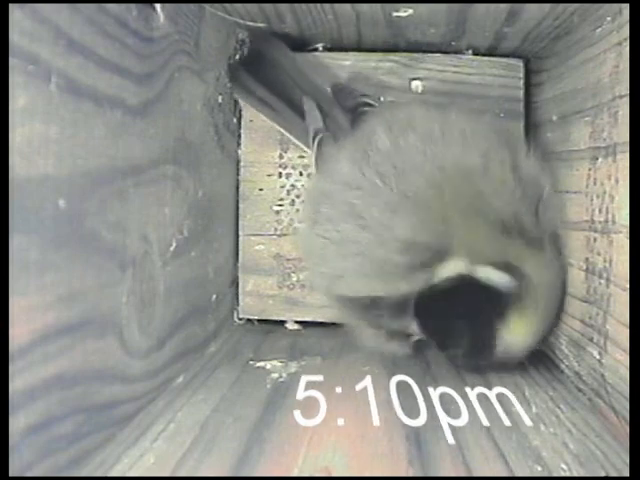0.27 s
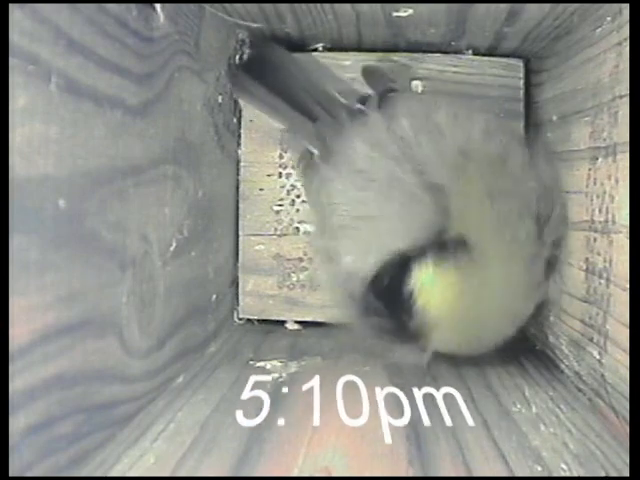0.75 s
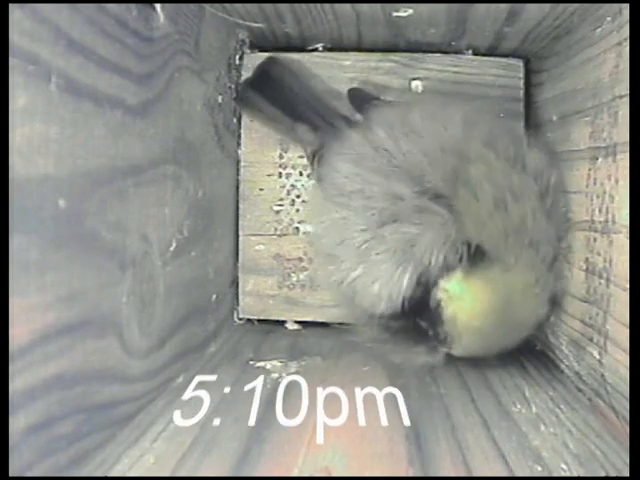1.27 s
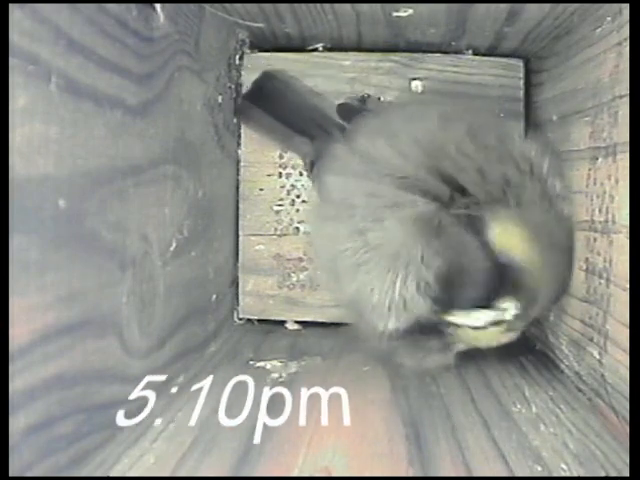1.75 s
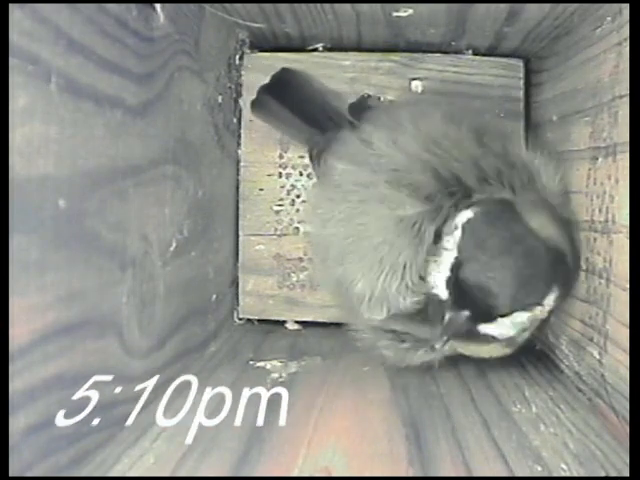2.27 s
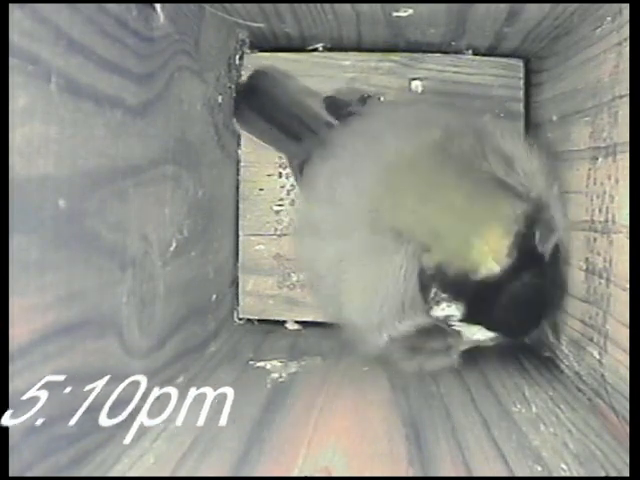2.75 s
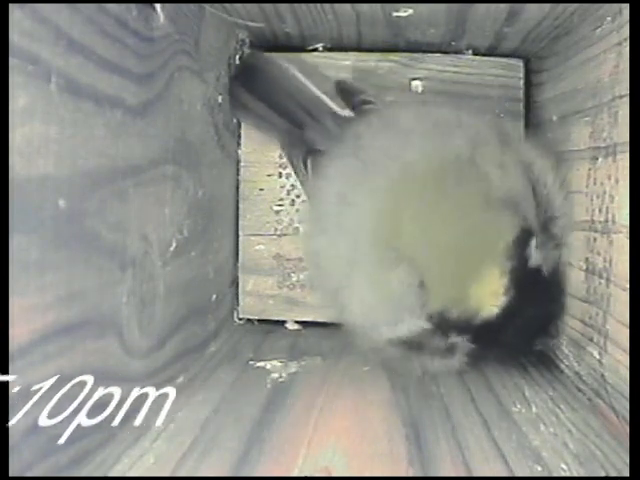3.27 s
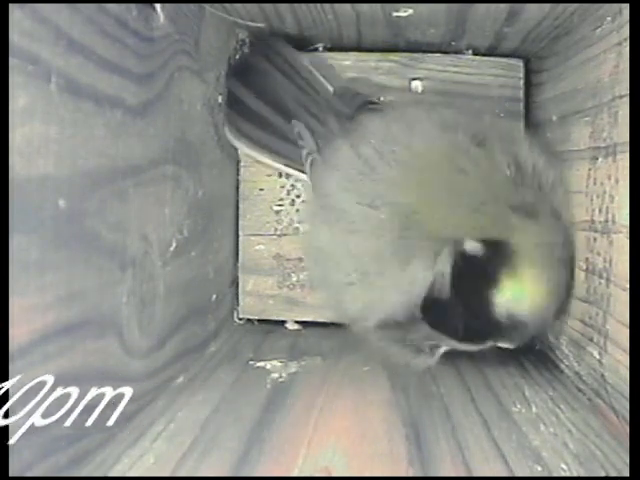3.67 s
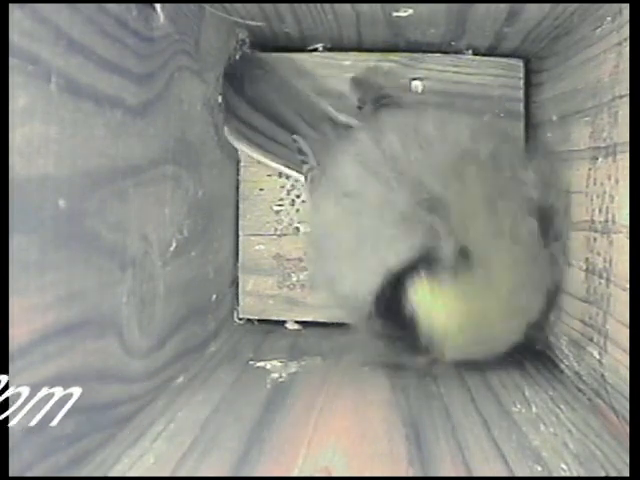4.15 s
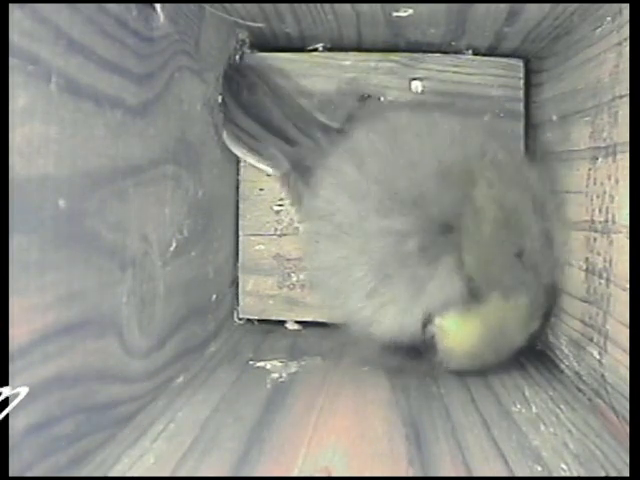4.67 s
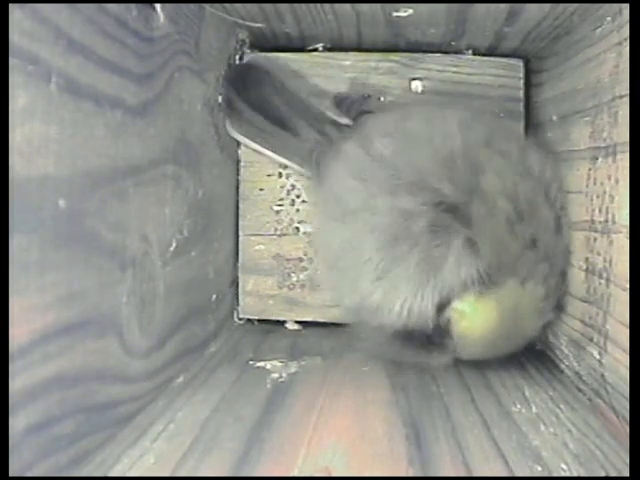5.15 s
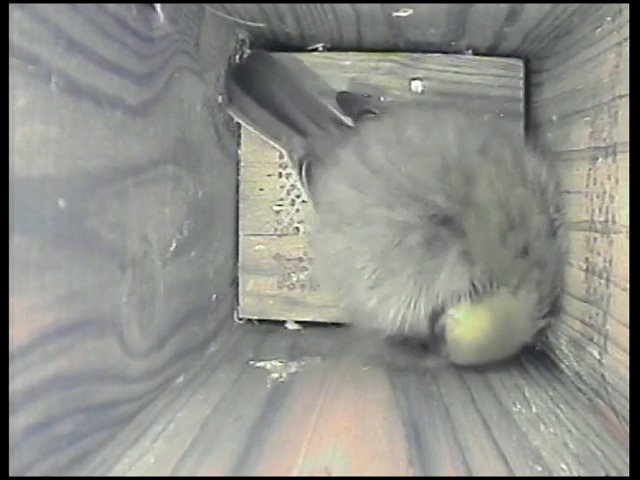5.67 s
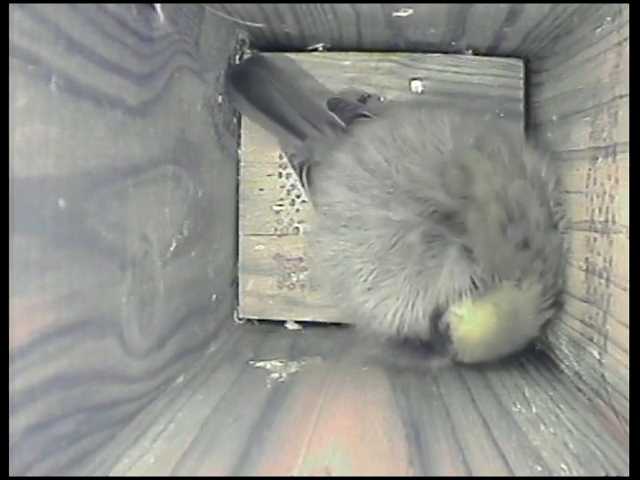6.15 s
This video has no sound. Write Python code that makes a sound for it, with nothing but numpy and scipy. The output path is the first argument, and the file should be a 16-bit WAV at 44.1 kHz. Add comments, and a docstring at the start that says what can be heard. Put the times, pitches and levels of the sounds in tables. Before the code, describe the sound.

A close mono microphone inside a small wooden nest box picks up a steady low hum, faint hiss and an extremely high, thin whine. At first there is only slight feather rustle, with a soft low bump near 0.5 s. Around 1 to 1.3 s, light claw steps patter, with a tiny bright scratch. At 1.7 s one crisp woody knock stands out as the loudest event. Smaller taps and soft floor nudges follow around 2 to 2.3 s. From 2.8 s light steps resume, leading to a hard knock and quick scratches at 3.3 s, then pattering and a brief hollow rub at 3.7 s. Between 4.4 and 5.1 s feather strokes come thick and dry, with muffled low thumps around 4.5 to 4.8 s. Faint steps and wall rubbing continue from 5.4 to 5.8 s. The hum deepens slightly near 5.9 s as the bird quietens until the end at about 6.4 s.

```python
"""A low hum in a wooden nest box, amplifier hiss and a thin line whine open the scene, with faint rustling.
A small bird then shuffles and preens right under a little camera: its body nudges the floor with low pushes,
its claws and beak knock, click and scratch on the boards, and its feathers and feet rub a wall.
Contacts are struck resonances, rustle and rubbing are shaped noise, hum is resonant noise, whine is sines."""
import sys
import numpy as np
from scipy.fft import rfft, irfft, next_fast_len
from scipy.io import wavfile
from scipy.ndimage import map_coordinates

SR = 44100
rng = np.random.default_rng(int(sys.argv[2]) if len(sys.argv) > 2 else 0)


def to_wav(sig):
    """Store sig (one row per channel, or 1-D mono) as 16-bit WAV at the path in sys.argv[1].

    Samples outside -1..1 are clipped; the rate is SR.
    """
    pcm = np.clip(np.atleast_2d(sig), -1, 1) * 32767
    pcm = np.round(pcm).astype(np.int16)
    wavfile.write(sys.argv[1], SR, pcm.T)  # frames by channels


N = 282240
TIME_S = np.arange(N) / SR
TOP_HZ = 16000

# "rel." levels are relative: a trim or normalisation follows; mode levels are peak gains
# low rumble, spectrum: [f/Hz, rel. level/dB per Hz]
RUMBLE_SPECTRUM = [(10, -20), (25, -5.5), (50, 1.5), (100, -5), (170, -8.5), (240, -1.5), (400, -25),
                   (700, -26.5), (2000, -61)]
# hum of the box over time: [t/s, rel. level/dB]
HUM_LEVEL = [(0, -49), (.8, -53.5), (1.7, -51.5), (2.4, -53), (3.0, -44), (3.4, -51), (4.1, -50.5),
             (5.1, -47), (5.4, -50), (6.4, -51)]
# modes of the hollow: [f/Hz, width/Hz, rel. level/dB]
HOLLOW_MODES = [(318.7, 34, 5), (258, 46, -7)]
# air of the box, spectrum: [f/Hz, rel. level/dB per Hz]
AIR_SPECTRUM = [(200, -9), (420, 2.5), (600, -7.5), (760, 5), (880, -1.5), (1020, -1), (1270, -4.5),
                (1520, 2), (1690, -9.5), (1830, -5.5), (2050, -21), (3000, -25), (8000, -69)]
# low drone that swells late: [t/s, level/dB rms]
SURGE_LEVEL = [(0, -71), (4.2, -56.5), (4.6, -58), (5.4, -59.5), (5.9, -50), (6.4, -55.5)]
# bands of that drone: [f/Hz, width/Hz, rel. level/dB]
SURGE_BANDS = [(100, 71, -2.5), (239.5, 19.5, 8)]
# amplifier hiss, spectrum: [f/Hz, rel. level/dB per Hz]
HISS_SPECTRUM = [(500, 1.5), (2700, 0.5), (3600, -2), (5000, -4), (7000, -1.5), (8500, -5.5), (10000, -13),
                 (13000, -14), (15500, -15)]
# camera whine: [f/Hz, level/dB rms]
WHINE_TONES = [(15625.4, -53.8), (9286.5, -81.5), (6334, -89)]
# restlessness, as feather stir: [t/s, level/dB before fidgeting]
STIR_LEVEL = [(0, -74), (.2, -73.5), (.7, -63.5), (1.2, -72.5), (1.5, -69), (1.75, -75), (2.5, -74.5),
              (2.75, -65), (3.05, -69), (3.4, -62), (3.85, -68), (4.5, -63), (4.8, -67), (5.25, -66),
              (5.8, -70), (6.4, -78.5)]
# stronger beak and wing strokes through feathers: [t/s, rel. level/dB, half length/s]
STROKES = [(.315, -65, 0.038), (0.874, -63.5, 0.028), (1.065, -61, .035), (1.3, -64.5, 0.037),
           (3.133, -63, .029), (3.557, -59.5, 0.026), (3.652, -61.5, 0.038), (3.742, -60, 0.042),
           (3.92, -60, 0.035), (4.427, -61, .035), (4.553, -58.5, 0.046), (4.687, -56.5, 0.022),
           (4.825, -57.5, .018), (4.982, -56.5, 0.024), (5.081, -59.5, 0.018), (5.324, -61, 0.018),
           (5.461, -58, .04), (5.592, -58.5, 0.021), (5.91, -62.5, 0.019)]
# feather rustle, spectrum: [f/Hz, rel. level/dB per Hz]
FEATHER_SPECTRUM = [(1000, -15), (2500, -20), (3800, -11), (5000, -3.5), (6600, -0.5), (8100, -0.5),
                    (9800, -9), (10700, -8), (12500, -15), (15000, -39)]
# air and boards of the box: [nominal f/Hz, width/Hz, rel. level/dB]
BOX_MODES = [(260, 140, -14.5), (556, 98, -48), (706, 93, 0.5), (939, 110, 6), (1182, 60, -9.5),
             (1516, 89, -2.5), (1740, 107, -9), (2710, 61, -9.5)]
# bright ring of a claw on wood: [nominal f/Hz, width/Hz, rel. level/dB]
CLAW_MODES = [(4600, 400, -5), (5715, 200, 4), (7250, 410, 2.5), (7850, 210, 7), (9540, 340, -2.5),
              (11060, 530, -12)]
# body against floor: [t/s, rel. level/dB, push f/Hz]
NUDGES = [(.525, -47, 86), (0.952, -46, 59), (1.076, -48, 75), (2.156, -43, 100), (2.18, -42, 114),
          (3.321, -45, 55.5), (3.726, -43.5, 55), (4.547, -36.5, 49), (4.667, -38, 50.6),
          (4.809, -39.5, 44.6), (5.298, -44, 54)]
# dull scuff of a nudge, spectrum: [f/Hz, rel. level/dB per Hz]
SCUFF_SPECTRUM = [(20, -6), (60, -12), (180, 5.0), (300, 1), (700, -54), (2000, -70)]
# claw and beak contacts: [t/s, knock peak level/dB, click rel. level/dB re knock, favoured centre f/Hz]
TAPS = [(0.971, -35, -17, 845), (1.181, -34.5, -26, 1050), (1.249, -41, -24, 940), (1.551, -38.5, -14, 923),
        (1.666, -35, -18, 836), (1.6893, -16.5, -20.5, 930), (1.701, -39, -35, 950),
        (1.819, -41.5, -15, 950), (2.017, -30, -22, 1550), (2.030, -27, -11, 990), (2.076, -44, -20, 900),
        (2.251, -53, 4, 1460), (2.762, -36, -32, 910), (2.795, -35, -14, 966), (3.105, -41, -23, 1510),
        (3.114, -27.5, -22, 939), (3.13, -33.5, -17, 915), (3.294, -36, -16, 750), (3.317, -22, -23, 980),
        (3.332, -34, 1.5, 1630), (3.443, -35, -26, 940), (3.679, -38, -16, 750), (4.089, -39.5, -10.5, 710),
        (4.557, -38.5, -3, 730), (5.688, -38, -18, 1550)]
# runs of light steps: [start t/s, end t/s, knock peak level/dB, favoured centre f/Hz]
SHUFFLES = [(1.052, 1.35, -43, 1110), (1.871, 1.949, -48.5, 930), (2.802, 2.92, -46.5, 1010),
            (3.452, 3.802, -44, 1480), (5.417, 5.75, -48, 790)]
# claws slipping over the grain: [t/s, ring level/dB, rasp rel. level/dB, half length/s, ring centre f/Hz]
SCRATCHES = [(1.062, -39.5, -70, 0.0022, 7100), (1.074, -55, -57, 0.0059, 5700),
             (1.679, -59, -67, 0.0057, 8500), (1.849, -50, -58, 0.0034, 5160),
             (3.317, -32, -37, 0.0013, 7900), (3.322, -41, -42.5, .0057, 7900),
             (3.338, -41, -45.5, 0.0059, 7800), (3.682, -57, -55.5, 0.011, 4600),
             (4.554, -55, -54, .0023, 7000), (4.839, -53, -55.5, 0.0025, 7900),
             (5.932, -52.5, -75, 0.0015, 4600)]
# rasp across the grain, spectrum: [f/Hz, rel. level/dB per Hz]
RASP_SPECTRUM = [(500, -13), (1500, 17), (2200, -6), (2800, -1), (3700, -4.5), (4300, -7), (6000, -14),
                 (7700, -1), (9100, -13), (10700, 0), (15000, -36)]
# feet and feathers on a wall: [t/s, level/dB rms at height, half length/s, mode f/Hz, width/Hz]
BRUSHES = [(1.282, -52, 0.023, 950, 140), (2.806, -59, 0.015, 950, 140), (3.687, -44.5, 0.013, 734, 5.9),
           (4.904, -54.5, 0.098, 765, 34), (5.66, -60.5, 0.4, 775, 31)]


def amp(db):
    """Decibels to gain."""
    return 10 ** (np.asarray(db) / 20)


def unit(x):
    """Scale to rms 1."""
    return x / np.sqrt(np.mean(x ** 2) + 1e-20)


def curve(points):
    """Interpolate (t/s, value) points to one value per sample."""
    t_s, values = np.transpose(points)
    return np.interp(TIME_S, t_s, values)


def filtered(x, response):
    """Multiply the spectrum of x by a response of frequency in Hz."""
    size = next_fast_len(len(x) + 8192)
    f_hz = np.fft.rfftfreq(size, 1 / SR)
    return irfft(rfft(x, size) * response(f_hz), size)[:len(x)]


def coloured(x, spectrum):
    """Shape x by (f/Hz, level/dB) points on a log-frequency axis, at rms 1."""
    hz, db = np.transpose(spectrum)
    return unit(filtered(x, lambda f: amp(np.interp(np.log(f + 1), np.log(hz), db))))


def ring(x, modes):
    """Drive parallel resonances of alternating sign."""
    def response(f):
        total = 0
        for k, (hz, width_hz, db) in enumerate(modes):
            resonance = hz * width_hz / (hz * hz - f * f + 1j * f * width_hz)
            total = total + (-1) ** k * amp(db) * resonance
        return total
    return filtered(x, response)


def noise():
    """White noise."""
    return rng.standard_normal(N)


def clipped_noise():
    """White noise held within +-2."""
    return np.clip(noise(), -2, 2)


def grains(rate_hz, spread_db):
    """Tiny slips of uneven size at random times, at rms 1."""
    slipping = rng.random(N) < rate_hz / SR
    return unit(slipping * noise() * amp(spread_db * clipped_noise()))


def wobble(rate_hz):
    """Smooth random curve, rate_hz knots a second."""
    return map_coordinates(clipped_noise(), [TIME_S * rate_hz])


def swell(t_s, half_s):
    """Smooth rise and fall of one movement."""
    return np.exp(-np.minimum(((TIME_S - t_s) / half_s) ** 2, 20))


def stroke(x, t_s, half_s):
    """Part of x sounded by one movement, rms 1 at its height."""
    shape = swell(t_s, half_s)
    return x * shape * np.linalg.norm(shape) / np.linalg.norm(x * shape)


def add(track, t_s, sound):
    """Mix a sound into the track at t_s."""
    room = track[round(t_s * SR):][:len(sound)]
    room += sound[:len(room)]


def favoured(modes, centre_hz, favour_db, octaves):
    """Where a contact lands favours modes near centre_hz; chance varies pitch and level."""
    chance = rng.normal(0, [.015, 1.5], (len(modes), 2))  # sd: fraction of pitch, dB
    varied = []
    for (hz, width_hz, db), (shift, luck_db) in zip(modes, chance):
        nearness = np.exp(-(np.log2(hz / centre_hz) / octaves) ** 2)
        varied.append((hz * (1 + shift), width_hz, db + favour_db * nearness + luck_db))
    return varied


def drone(rumble_db, hum_trim_db, air_db):
    """Background noise hums, at varying level, in the hollow of the box and its higher modes."""
    rumble = amp(rumble_db) * coloured(noise(), RUMBLE_SPECTRUM)
    hollow = filtered(ring(noise(), HOLLOW_MODES), lambda f: 1 / (1 + (f / 480) ** 4))  # low-pass
    hum = amp(curve(HUM_LEVEL) + hum_trim_db) * unit(hollow)
    air = amp(air_db) * coloured(noise(), AIR_SPECTRUM)
    surge = amp(curve(SURGE_LEVEL)) * unit(ring(noise(), SURGE_BANDS))
    return rumble + hum + air + surge


def camera(hiss_db):
    """Amplifier hiss and the steady sine whine of the line scan."""
    whine = sum(amp(db) * np.sqrt(2) * np.sin(2 * np.pi * hz * TIME_S) for hz, db in WHINE_TONES)
    return amp(hiss_db) * coloured(noise(), HISS_SPECTRUM) + whine


def feathers(stroke_trim_db, box_db, bright_db, crackle_db, crackle_rate_hz, flick_db):
    """Barbs slide in tiny uneven bursts, a few flick free; the wood faintly answers, low and bright."""
    # small movements between strokes: 27 knots a second, 2.5 dB depth
    fidget = amp(curve(STIR_LEVEL) + 2.5 * wobble(rate_hz=27))
    power = fidget ** 2
    for t_s, db, half_s in STROKES:
        power += (amp(db + stroke_trim_db) * swell(t_s, half_s)) ** 2
    effort = np.sqrt(power)
    bursts = map_coordinates(clipped_noise(), [TIME_S * crackle_rate_hz], order=1)
    sliding = unit(amp(crackle_db * bursts) * noise())
    barbs = sliding + amp(flick_db) * grains(rate_hz=430, spread_db=0)
    wood = amp(box_db) * unit(ring(barbs, BOX_MODES)) + amp(bright_db) * unit(ring(barbs, CLAW_MODES))
    return effort * unit(coloured(barbs, FEATHER_SPECTRUM) + wood)


def nudges(trim_db, rise_s, scuff):
    """A shift of weight is one soft low push with a dull scuff."""
    out, t = np.zeros(N), np.arange(SR // 10) / SR
    rub = coloured(noise(), SCUFF_SPECTRUM)
    envelope = t / rise_s * np.exp(1 - t / rise_s)
    for t_s, db, push_hz in NUDGES:
        push = np.sin(2 * np.pi * push_hz * t) + scuff * rub[round(t_s * SR):][:len(t)]
        add(out, t_s, amp(db + trim_db) * push * envelope)
    return out


def contacts(count):
    """Distinct taps, plus count light steps spread unevenly over each shuffle."""
    steps = []
    for start_s, end_s, db, centre_hz in SHUFFLES:
        times_s = start_s + (end_s - start_s) * (np.arange(count) + rng.random(count)) / count
        steps += [(t_s, db, -13, centre_hz) for t_s in times_s]
    return TAPS + steps


def knocks(taps, favour_db, octaves, skid, skid_t60_s, soft_hz):
    """Each contact knocks the boards and skids a little."""
    out, t = np.zeros(N), np.arange(SR // 10) / SR
    for t_s, db, _, centre_hz in taps:
        blow = (t == 0) + skid * rng.standard_normal(len(t)) * amp(-60 * t / skid_t60_s)
        # soft wood yields and rounds off the blow
        rounded = ring(blow, [(soft_hz, soft_hz, 0)])
        knock = ring(rounded, favoured(BOX_MODES, centre_hz, favour_db, octaves))
        add(out, t_s, amp(db) * knock / np.abs(knock).max())
    return out


def clicks(taps, trim_db, t60_s, rise_s):
    """After each contact the claw skids for a few milliseconds and rings brightly."""
    out, t = np.zeros(N), np.arange(SR // 10) / SR
    envelope = (1 - np.exp(-t / rise_s)) ** 2 * amp(-60 * t / t60_s)
    for t_s, db, claw_db, _ in taps:
        skid = rng.standard_normal(len(t)) * envelope
        click = ring(skid, CLAW_MODES)
        add(out, t_s, amp(db + claw_db + trim_db) * click / np.abs(click).max())
    return out


def scratches(rasp_trim_db, favour_db, octaves):
    """A claw sticks and slips quickly across the wood: slips rasp and excite a bright ring."""
    slips = grains(rate_hz=7000, spread_db=4)
    rasp, out = coloured(slips, RASP_SPECTRUM), np.zeros(N)
    for t_s, ring_db, rasp_db, half_s, centre_hz in SCRATCHES:
        bright = ring(slips, favoured(CLAW_MODES, centre_hz, favour_db, octaves))
        out += amp(ring_db) * stroke(bright, t_s, half_s)
        out += amp(rasp_db + rasp_trim_db) * stroke(rasp, t_s, half_s)
    return out


def brushes():
    """Soft rubbing feeds one mode of a wall."""
    out = np.zeros(N)
    for t_s, db, half_s, hz, width_hz in BRUSHES:
        out += amp(db) * stroke(ring(noise(), [(hz, width_hz, 0)]), t_s, half_s)
    return out


def scene():
    """The box, the camera and the bird, in mono."""
    background = drone(rumble_db=-59, hum_trim_db=0.5, air_db=-57.5) + camera(hiss_db=-69.5)
    taps = contacts(count=9)
    bird = (feathers(stroke_trim_db=1.5, box_db=-3.5, bright_db=-14,
                     crackle_db=5, crackle_rate_hz=370, flick_db=-7.5)
            + nudges(trim_db=-1.5, rise_s=0.0065, scuff=0.72)
            + knocks(taps, favour_db=9, octaves=0.21, skid=0.098, skid_t60_s=0.038, soft_hz=2120)
            + clicks(taps, trim_db=2, t60_s=0.015, rise_s=0.00031)
            + scratches(rasp_trim_db=3, favour_db=11.5, octaves=0.13)
            + brushes())
    return (background + bird)[None]


def record(dry):
    """Nothing passes at or above the band limit."""
    return np.array([filtered(x, lambda f: f < TOP_HZ) for x in dry])


dry = scene()
out = record(dry)
to_wav(out)
```